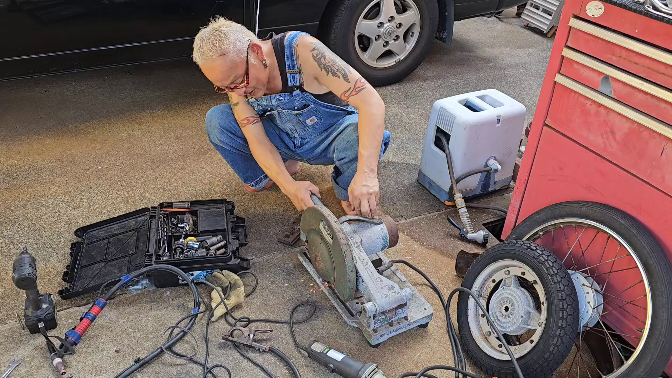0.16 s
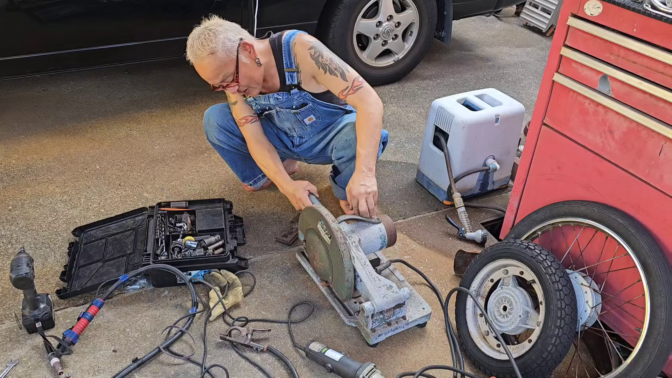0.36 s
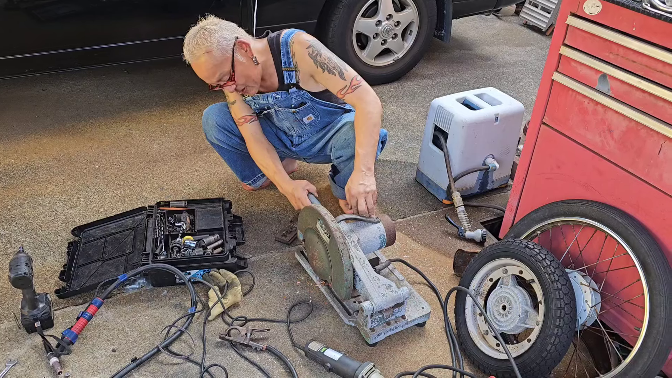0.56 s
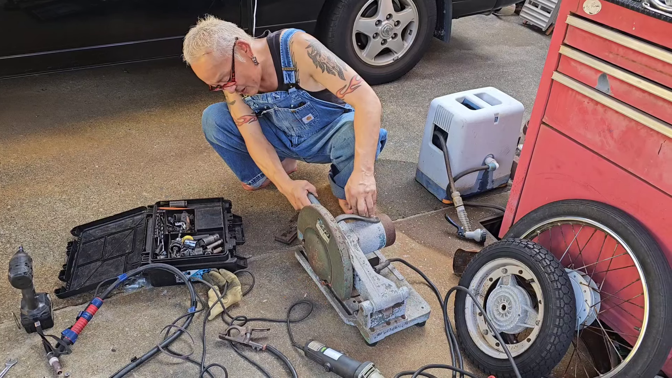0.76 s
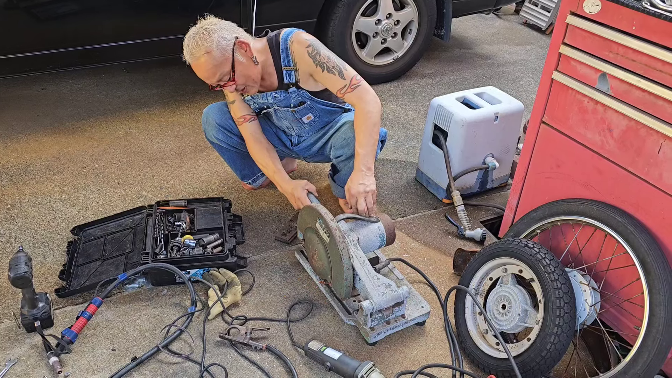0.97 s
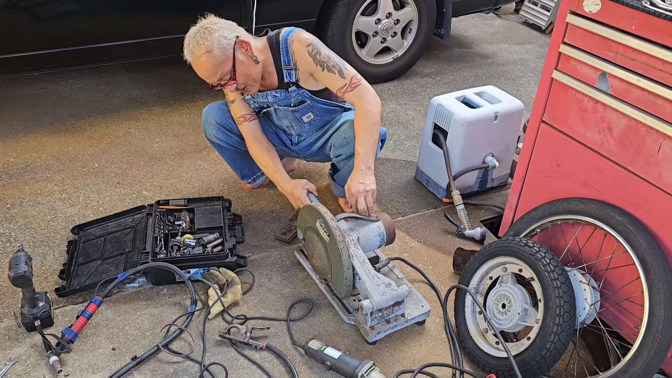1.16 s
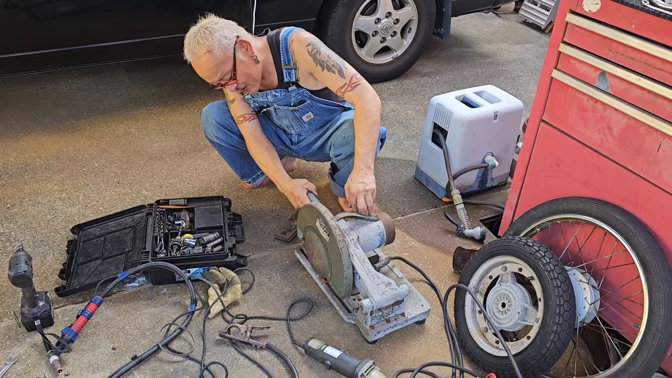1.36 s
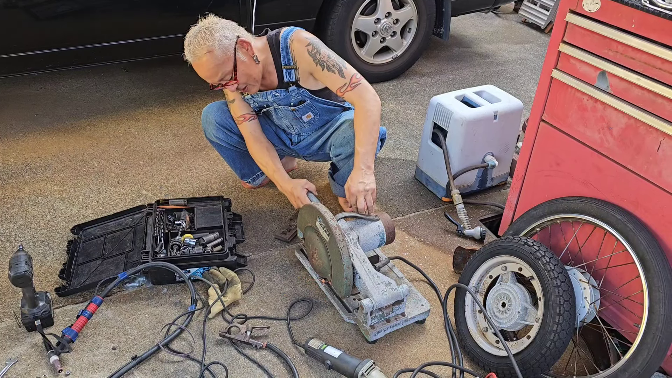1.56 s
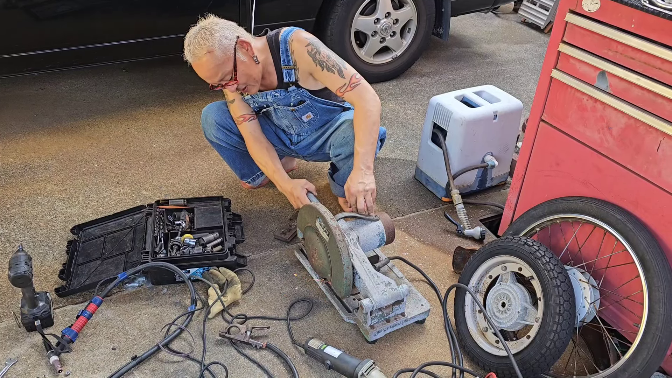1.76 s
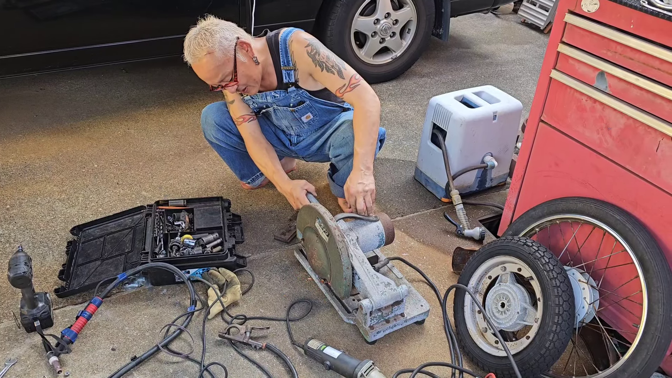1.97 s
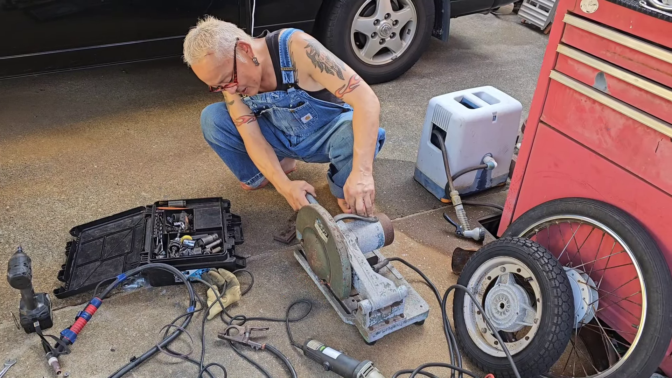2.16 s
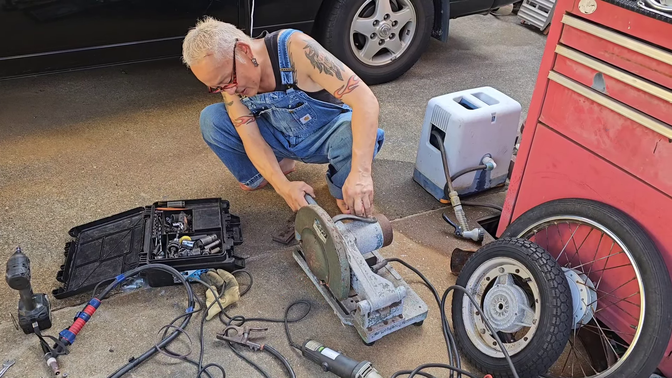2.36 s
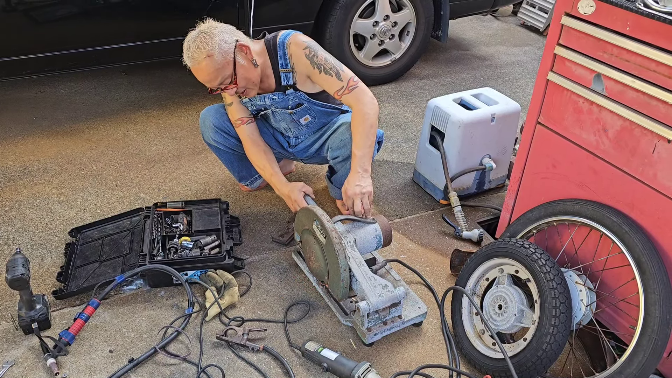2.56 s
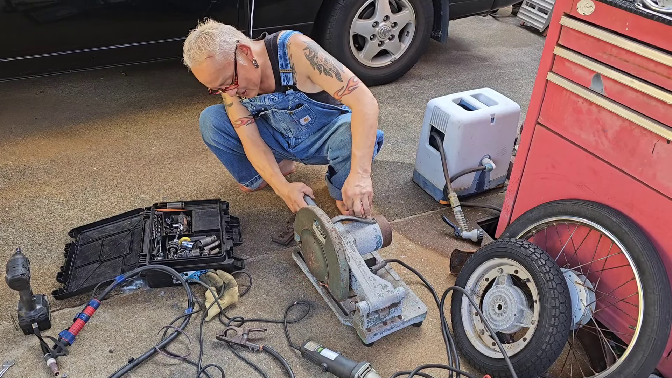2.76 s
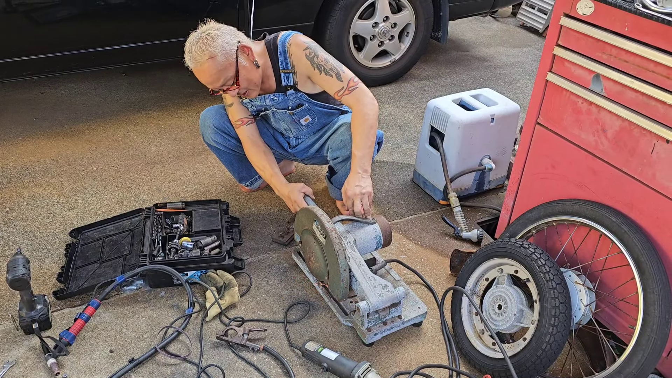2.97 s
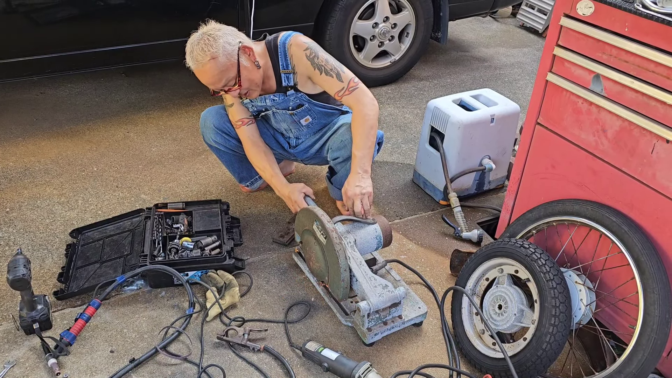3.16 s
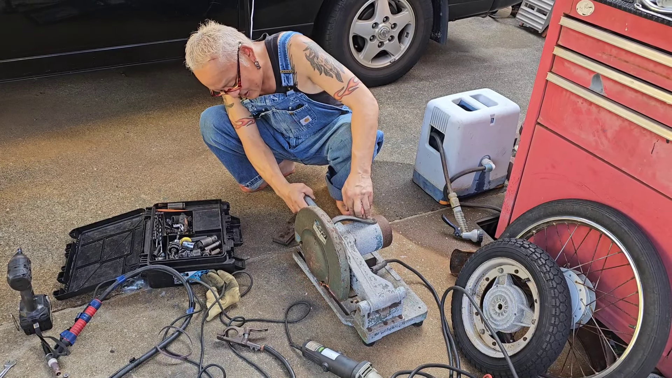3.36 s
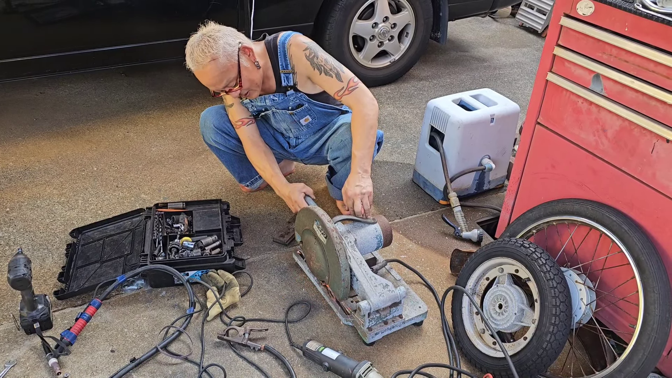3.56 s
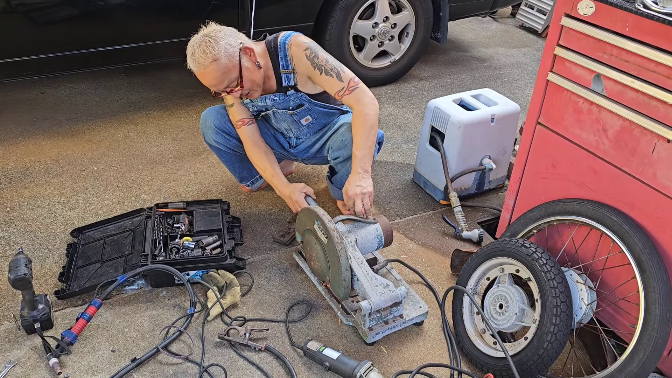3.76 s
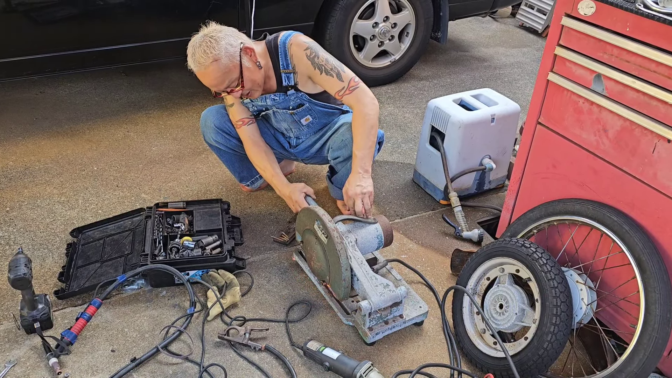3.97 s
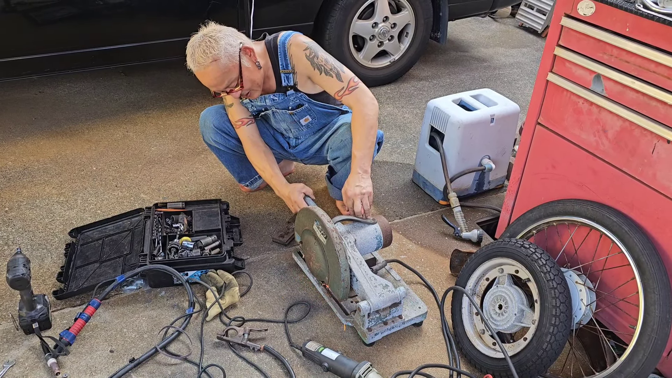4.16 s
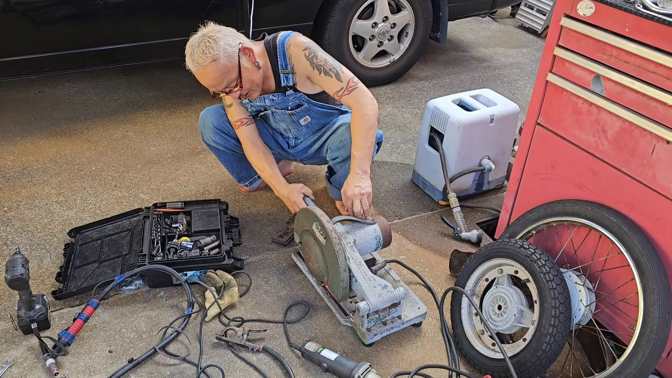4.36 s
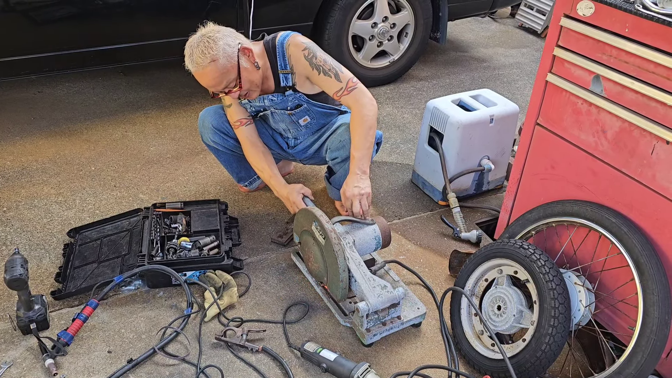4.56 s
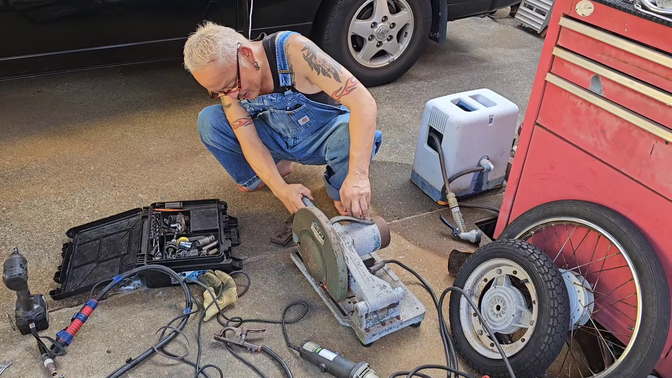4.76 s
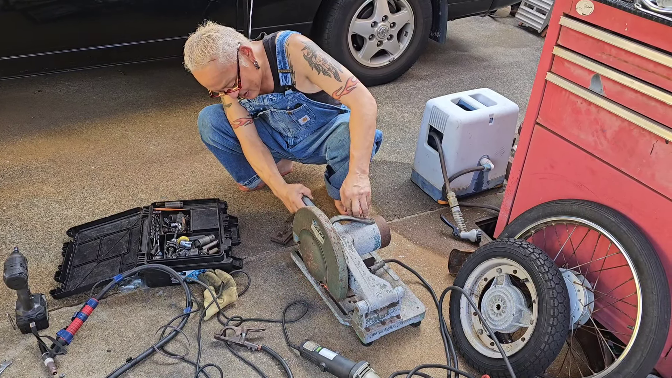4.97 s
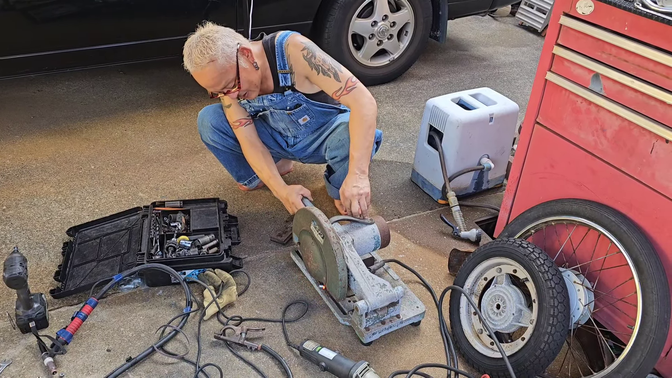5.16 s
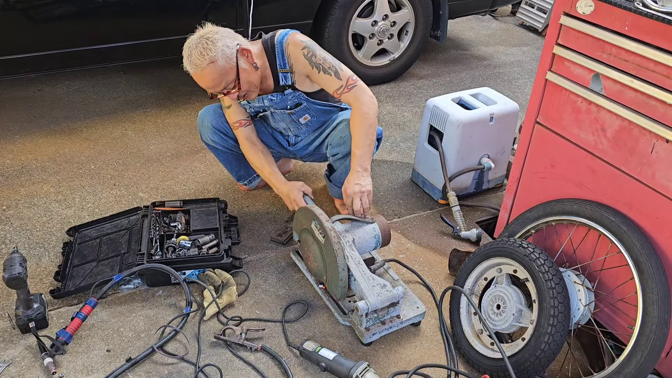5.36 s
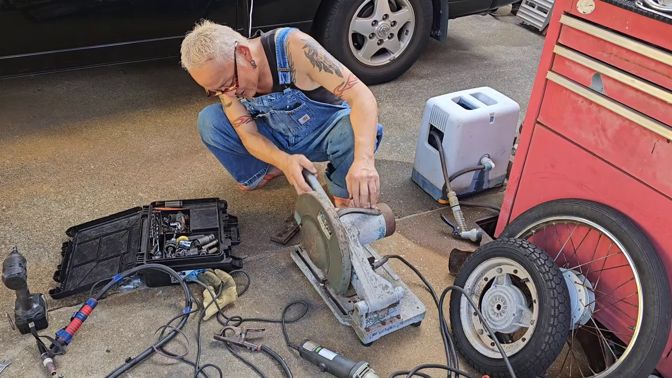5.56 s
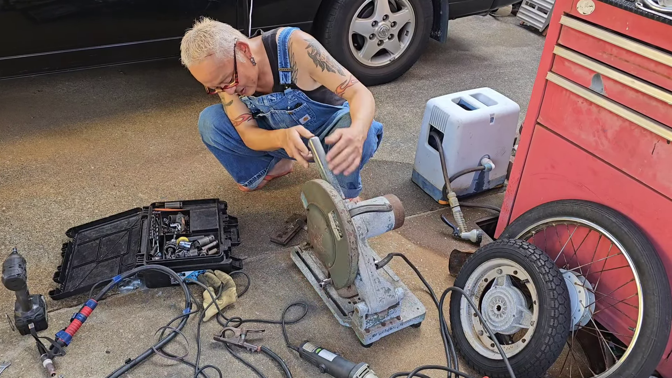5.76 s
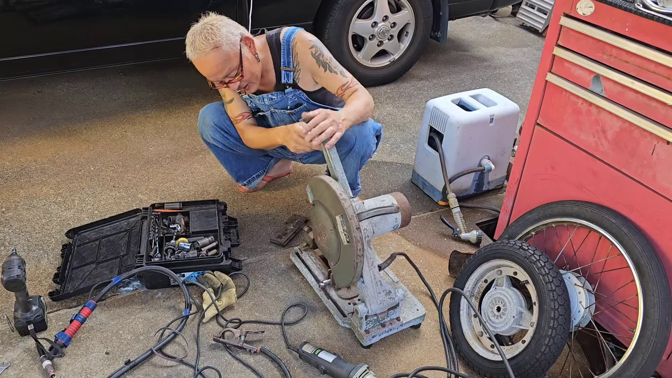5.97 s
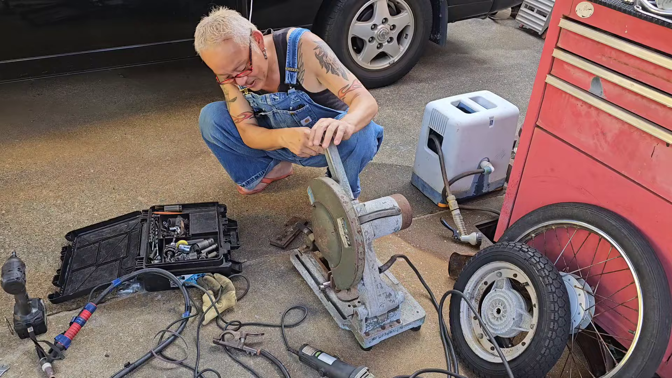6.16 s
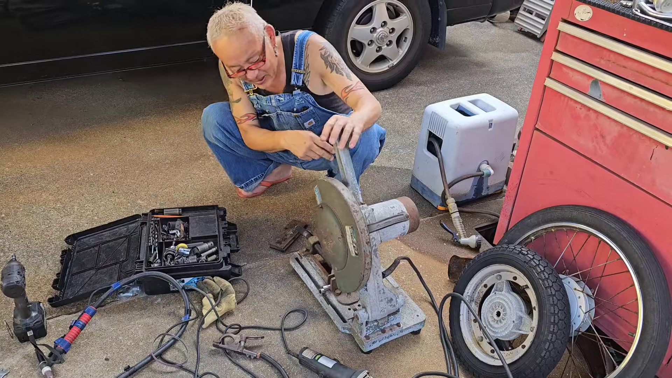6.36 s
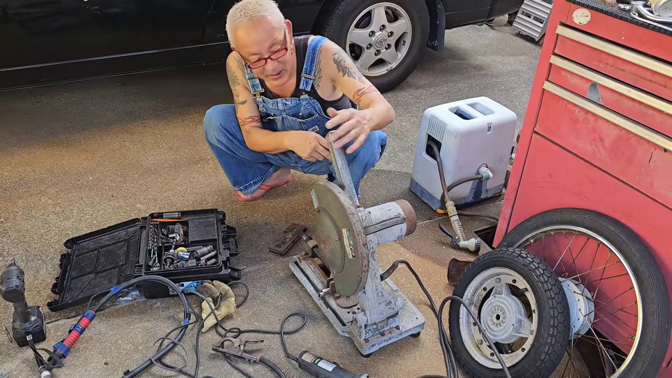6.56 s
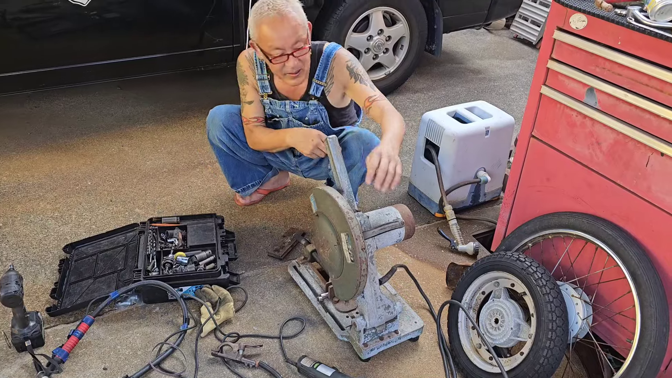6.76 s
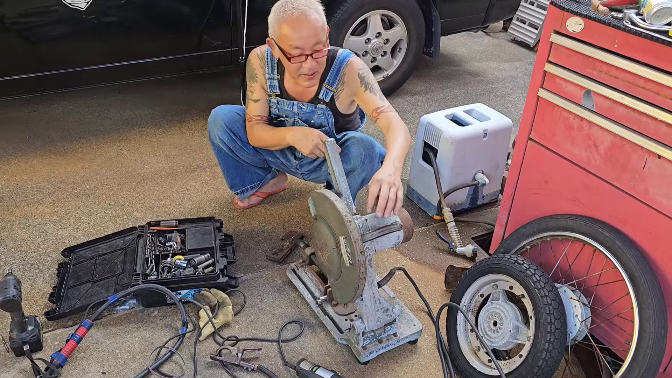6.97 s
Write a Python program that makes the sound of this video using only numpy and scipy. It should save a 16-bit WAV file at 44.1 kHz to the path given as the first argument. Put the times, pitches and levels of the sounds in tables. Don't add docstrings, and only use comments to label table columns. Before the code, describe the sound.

A chop saw is already biting into metal at full loudness, its electric whine wavering over harsh metallic grinding, ringing tube and sizzling grit. Late in the cut the motor speeds up, the last thin wall chatters and the grinding drops away. The disc coasts with a much quieter airy whir and sinking gear tone, and the lifted arm clacks. Mono phone pickup, nearly dry, faint short echoes, low rumble.

```python
import sys
import numpy as np
from scipy import signal
from scipy.fft import rfft, irfft
from scipy.io import wavfile
from scipy.ndimage import uniform_filter1d

SR = 44100
rng = np.random.default_rng(int(sys.argv[2]) if len(sys.argv) > 2 else 0)


def int16_out(signal):
    q = np.round(np.clip(np.atleast_2d(signal).T, -1, 1) * 32767)
    wavfile.write(sys.argv[1], SR, q.astype(np.int16))


def elevation(decibels):
    levels = np.asarray(decibels, float)
    return 10 ** (levels / 20)


N = 308700
STEP = 64
DISC_PER_SHAFT = 8 / 35
SWITCH_OFF_S = 5.5
STEADY_DB = 0.3

WHINE_ORDERS = (14, 14, 14, 8, 8.56, 7.8, 24, 1.003)
RIPPLE_HZ = (0, 100, -100, 0, 0, 0, 0, 0)
# time_s [s], level_db [dB]
COAST = [
    (5.52, -30),
    (5.7, -33),
    (6.3, -33.5),
    (6.55, -31),
    (6.85, -27),
    (7, -25.5),
]


def unit(x):
    return x / np.sqrt(np.mean(x ** 2))


def columns(table):
    s, *cols = np.transpose(table)
    return [np.interp(np.arange(N) / SR, s, c) for c in cols]


def window(t0, t1, fade):
    t = np.arange(N) / SR
    return np.clip(np.minimum(t - t0, t1 - t) / fade, 0, 1)


def bumps(t, table):
    return sum(db * np.exp(-((t - s) / half) ** 2) for s, half, db in table)


def walk(rate):
    hold = max(int(SR / STEP / rate), 1)
    held = np.repeat(rng.standard_normal(N // STEP // hold + 2), hold)
    return 1.01 * uniform_filter1d(uniform_filter1d(held, hold), hold)[:N // STEP + 2]


def fine_grid(slow):
    return np.interp(np.arange(N) / STEP, np.arange(len(slow)), slow)


def sway(db, rate):
    return fine_grid(elevation(db * walk(rate)))


def steep_mode(x, hz, width):
    b, a = signal.iirpeak(hz, hz / (1.5 * width), SR)
    return signal.sosfilt([[*b, *a]] * 2, x)


def ring(x, modes, drift_db):
    out = 0
    for k, (hz, width, db) in enumerate(modes):
        out = out + (-1) ** k * elevation(db) * sway(drift_db, 4.03) * steep_mode(x, hz, width)
    return unit(out)


def response(hz, modes):
    return np.abs(sum(elevation(db) / (1 + 2j * (hz - centre_hz) / width) for centre_hz, width, db in modes))


def colour(x, points):
    hz, db = np.transpose(points)
    f = np.arange(N // 2 + 1) * SR / N + 1
    gain = elevation(np.interp(np.log(f), np.log(hz), db, -90, -90))
    return unit(irfft(rfft(x) * gain, N))


def grit(turns, repeat, wear_turns, scatter=0.5):
    cells = 1024
    wear = turns / wear_turns
    patterns = rng.standard_normal((128, cells))
    row = wear.astype(int) % 127
    fade = np.sin(wear % 1 * np.pi / 2)
    cell = (turns % 1 * cells).astype(int)
    worn = np.sqrt(1 - fade ** 2) * patterns[row, cell] + fade * patterns[row + 1, cell]
    share = np.clip(repeat, 0, 1)
    fresh = rng.standard_normal(N) * np.exp(scatter * rng.standard_normal(N))
    return np.sqrt(share) * worn + np.sqrt(1 - share) * unit(fresh)


def shaft():
    # time_s [s], shaft_hz [Hz]
    loaded_speed = [(0, 153.6), (.27, 154), (.55, 160.3), (.75, 166.3), (.95, 168.8), (1.07, 170.5),
                    (1.25, 174.3), (1.5, 176), (2, 177), (2.3, 174.7), (2.68, 176.3), (2.85, 174.8),
                    (3.25, 166.2), (3.6, 167.3), (4.25, 166.2), (4.6, 172.6), (4.8, 172.9), (5.18, 184.3)]
    inertia_s, race_hz_per_s = 0.09, 133
    idle_hz, slowing_from_s, slowing_hz_per_s = 225.5, 5.56, 20.6
    t = np.arange(N) / SR
    racing = uniform_filter1d(columns(loaded_speed)[0], size=int(inertia_s * SR))
    racing = racing + race_hz_per_s * np.maximum(t - loaded_speed[-1][0], 0)
    return np.minimum(racing, idle_hz - slowing_hz_per_s * np.maximum(t - slowing_from_s, 0))


def cut(turns):
    # time_s [s], depth [0-1]
    runout = [
        (0, 0.05),
        (5.05, 0.12),
        (5.3, 0.28),
        (5.66, 0.98),
    ]
    # pitch_hz [Hz], width_hz [Hz], level_db [dB]
    base_modes = [(244, 19, -17.5), (325.6, 64, -13), (471, 52.6, 2), (692, 81, -6), (849, 64, -12),
                  (994, 390, -18.5)]
    tube_modes = [(1164, 99, -10.5), (1286, 130, -3.5), (1416, 194, -3), (1602, 133, 1.5), (1793, 88, -8)]
    wall_modes = [(1930, 160, 4), (2087, 73, 1), (2307, 206, 0.5), (2590, 120, -10.5)]
    guard_modes = [(2786, 203, 15.5), (2897, 76, 14), (3080, 26, 4)]
    rim_modes = [(6140, 180, -6.5), (6485, 60, 0.5), (6070, 580, -10)]
    spark_modes = [(6770, 300, -2), (7530, 710, -3), (8400, 340, -4.5), (9180, 940, -5.5),
                   (14400, 4400, -11.5)]
    disc_sing_modes = [(11130, 740, -2), (11240, 660, 2)]
    plate_free = [(6290, 110, 4), (7230, 77, -2), (7550, 70, 5), (8400, 76, -17), (9100, 70, -5),
                  (9400, 84, -5), (9900, 80, -7)]
    plate_sunk = [(6150, 350, -2), (7650, 71, 0), (9360, 210, -9), (11000, 200, -10), (12300, 210, -14)]
    seam_modes = [(1573, 33, 0)]
    # time_s [s], half_length_s [s], level_db [dB]
    seam_rings = [(0.301, .12, 4.9), (1.05, .13, 5.5), (1.85, 0.094, 10.6), (2.36, 0.12, 13),
                  (2.63, 0.077, 15), (3, 0.2, 8.8), (3.55, 0.17, 8), (4.1, 0.25, 5.1), (4.7, 0.25, 3.7),
                  (5.1, 0.22, 9.7)]
    # pitch_hz [Hz], level_db [dB per Hz]
    floor_hiss = [(1710, -31), (2900, -4), (3580, -7), (4090, -4), (5010, -5.5), (6180, -3), (6820, -2),
                  (10000, -9.5), (14500, -14.5), (15500, -12)]
    plate_drift_db = 3.5
    tube_db, wall_db, base_db, floor_db, rim_db, spark_db, sing_db, guard_db = body_levels()
    t = np.arange(N) / SR

    depth = np.clip(columns(runout)[0], 0, 1)
    bite = 1 + depth * np.sin(2 * np.pi * turns + fine_grid(1.5 * walk(9.3)))
    ripple = 1 + 0.04 * np.sin(2 * np.pi * 100 * t)
    pressure = bite * ripple * sway(0.59, 17.0) * sway(0.53, 20.5)
    coarse = grit(turns, 0.52, 9.0) * bite * ripple
    fine = grit(turns, 0.26, 4.0) * pressure

    base = ring(grit(turns, 0.3, 6.0) * bite * sway(0.87, 22), base_modes, 0.96)
    guard = ring(grit(turns, 0.93, 4.0) * bite, guard_modes, STEADY_DB)
    out = elevation(base_db + 2.5) * base + elevation(guard_db - 4.5) * guard
    out += elevation(tube_db - 0.2) * ring(coarse, tube_modes, 1.8)
    out += elevation(wall_db + 2.0) * ring(coarse, wall_modes, 1.8)
    out += elevation(floor_db + 7.5) * colour(grit(turns, 0.19, 5.0) * pressure, floor_hiss)

    out += elevation(rim_db - 3.5) * sway(1.5, 18) * ring(fine, rim_modes, STEADY_DB)
    out += elevation(sing_db - 1.5) * sway(1.5, 18) * ring(fine, disc_sing_modes, STEADY_DB)
    out += elevation(spark_db - 1.0) * ring(fine, spark_modes, 4.0)
    out += sway(2.3, 26) * passing_rings(fine)

    out += elevation(-26 + bumps(t, seam_rings)) * ring(coarse, seam_modes, STEADY_DB)
    out += elevation(spark_db - 9.5) * ring(fine, plate_free, plate_drift_db)
    out += elevation(-32) * window(2.51, 7.0, 0.2) * ring(fine, plate_sunk, plate_drift_db)
    return out * window(-1.1, 5.66, 0.26)


def body_levels():
    # time_s [s], feed_db on the handle [dB], free_rim_db [dB], rub_db of the disc flanks [dB]
    cut_course = [(0, -0.5, 5, -3), (.19, -2, 5, 1), (.39, 8.5, 5, -4), (.77, 3.5, 1.5, 11),
                  (1.06, -6.5, 2.5, 7.5), (1.2, -12.5, 1.5, 13), (1.34, -5.5, 4.5, 13),
                  (1.99, -3.5, 3, 7.5), (2.2, 3.5, 3, 4), (2.54, 2, -1, -4), (2.79, 8.5, 1, 5),
                  (2.93, -0.5, -9, -16), (3.2, 4.5, -9, -17), (3.4, -3.5, -10, 2), (3.96, -2, -16, -4),
                  (4.49, -4.5, -11, 11), (4.93, -6.5, -30, 3.5), (5.35, -15.5, -4, 7)]
    # level_db [dB], shares of feed, free rim and rub [dB per dB], deepening [dB per s]
    bodies = [
        (-15.5, 0.27, .01, .01, -0.67),
        (-21, .01, 0.012, 0.056, 0),
        (-25, 0.69, .01, 0.0093, 0.63),
        (-33, 0.024, 0.042, 0.11, 1.57),
        (-21.5, .01, .01, 0.5, -0.57),
        (-14.5, .01, 0.38, 0.21, -4),
        (-23, .01, 1, .01, 0.54),
    ]
    # time_s [s], level_db [dB]
    wall_bite = [(0, -1), (1.1, -2.5), (1.34, 5), (2.05, 0.5), (2.5, 0.5), (2.95, -1.5), (3.15, 3),
                 (3.6, 0), (5.1, 0.5), (5.3, -4.5)]
    # time_s [s], half_length_s [s], level_db [dB]
    clamp_slack = [(.55, 0.35, -0.5), (1.06, 0.18, 5.5), (1.505, 0.11, -2.5), (0.036, 0.076, 1),
                   (1.893, 0.2, -2), (2.297, .15, 0.5), (2.615, 0.082, -3.5), (3.4, 0.13, -1.5),
                   (5.1, 0.15, -0.5)]
    # start_s [s], end_s [s], fade_s [s], level_db [dB]
    faces = [
        (-0.95, 1.11, 0.95, -9.5),
        (0.5, 2.33, 0.4, -24),
        (5, 5.3, 0.14, -14.5),
    ]
    guard_rest_db, bite_on_tube = -29.5, 0.44
    feed, free, rub = columns(cut_course)
    t = np.arange(N) / SR
    levels = [db + a * feed + b * free + c * rub + slope * t for db, a, b, c, slope in bodies]
    bite_db = columns(wall_bite)[0]
    levels[0] = levels[0] + bite_on_tube * bite_db + bumps(t, clamp_slack)
    levels[1] = levels[1] + bite_db
    guard = elevation(guard_rest_db) + sum(elevation(db) * window(t0, t1, fade) ** 2 for t0, t1, fade, db in faces)
    return levels + [20 * np.log10(guard)]


def passing_rings(scrape):
    # start_s [s], end_s [s], level_db [dB], pitch_hz [Hz], width_hz [Hz]
    ring_spans = [(2.06, 2.48, -24, 5200, 670), (2.12, 2.38, -23, 5750, 500), (2.12, 2.45, -26, 6100, 220),
                  (2.08, 2.32, -22.5, 6900, 250), (-.3, 0.52, -29, 4290, 83), (-.15, .4, -28, 497, 47),
                  (1.9, 2.94, -24, 461, 29), (3.8, 4.8, -31.5, 473, 50), (4.15, 4.78, -32, 856, 84),
                  (.25, 1.2, -30.5, 3150, 65), (.85, 1.25, -23, 2110, 120), (.15, 0.53, -21, 2320, 120),
                  (4.86, 5.28, -23, 2850, 220), (-.2, .5, -29, 4000, 660), (5.2, 5.62, -33.5, 910, 550),
                  (2.75, 3.1, -28.5, 3960, 100), (4.55, 4.85, -30, 3990, 54), (5.02, 5.28, -28, 4130, 297),
                  (5.1, 5.24, -26, 4300, 270), (2.54, 2.66, -23.5, 6200, 500), (5.27, 5.4, -29, 3200, 350),
                  (1.75, 2.2, -22, 2200, 93)]
    out = np.zeros(N)
    for start, end, db, hz, width in ring_spans:
        span = slice(max(int(start * SR), 0), int(end * SR))
        t = np.arange(N)[span] / SR
        fade = np.clip(np.minimum(t - start, end - t) / (0.3 * (end - start)), 0, 1)
        out[span] += elevation(db) * fade * unit(steep_mode(scrape[span], hz, width))
    return out


def web(turns):
    # time_s [s], level_db [dB]
    web_course = [(5.22, -43), (5.3, -33), (5.37, -18), (5.44, -20), (5.5, -18), (5.54, -21.5),
                  (5.575, -28), (5.592, -22), (5.62, -26), (5.66, -39)]
    # pitch_hz [Hz], width_hz [Hz], level_db [dB]
    web_modes = [(1940, 230, 6.5), (2850, 53, -5), (3289, 266, 3), (4630, 81, -9), (5200, 240, -1.5),
                 (6104, 165, -2), (6800, 150, -10), (7160, 73, 1), (8300, 410, -8.5), (9440, 310, -6.5),
                 (10800, 510, -10), (12400, 400, -14)]
    burst = np.exp(0.45 * np.sin(2 * np.pi * turns + 1.2)) * sway(1.2, 40)
    rattle = ring(rng.standard_normal(N) * burst, web_modes, STEADY_DB)
    return elevation(columns(web_course)[0] + 5.5) * rattle * window(5.2, 5.68, 0.042)


def motor(shaft_hz, levels_db):
    whine_throb = (0.091, 0.039, 0.35, 0.3, 0.23, 0.23, 0.22, 0.05)
    # multiple of shaft, level_db [dB], pitch_hz [Hz], width_hz [Hz]
    resonant_orders = [(16, -21, 2925, 142), (16.15, -20.5, 2470, 140), (11.98, -27, 2610, 76),
                       (0.99, -47, 166, 9.67), (9.48, -29, 1896, 160), (47.8, -37, 8000, 260)]
    # start_s [s], end_s [s], multiple of disc, level_db [dB]
    disc_hum = [(0.37, 1.1, 5, -45), (.2, 1.17, 6, -49), (0.24, 1.05, 7, -38.5), (1.33, 1.89, 8, -36.5),
                (1.968, 3.206, 6, -40.5), (1.95, 2.92, 7, -33), (2.94, 4.2, 6, -44), (2.75, 3.86, 5, -44.5),
                (3.42, 4.773, 8, -36), (1.4, 2.149, 24, -37), (2.35, 3.04, 24, -34.5),
                (3.005, 5.1, 26, -44), (3.97, 4.952, 23, -36.5), (4.11, 4.599, 25, -29.5),
                (1.48, 2.03, 47, -18), (1.26, 2.23, 57, -25), (1.75, 2.3, 70, -40)]
    turns, t, out = np.cumsum(shaft_hz) / SR, np.arange(N) / SR, 0
    disc = 2 * np.pi * DISC_PER_SHAFT * turns
    live = window(-1.1, SWITCH_OFF_S, 0.082)
    for order, ripple, throb, db in zip(WHINE_ORDERS, RIPPLE_HZ, whine_throb, levels_db):
        pulse = 1 + throb * np.sin(disc + fine_grid(3.2 * walk(12)))
        swell = elevation(db) * sway(0.93 + 6.7 * throb, 30) * pulse
        if order > 9:
            swell = swell * live
        jitter = fine_grid((0.35 + throb) * walk(25))
        out = out + swell * np.sin(2 * np.pi * (order * turns + ripple * t) + jitter)
    for order, db, hz, width in resonant_orders:
        near = elevation(db) * sway(2.2, 14) / (1 + (2 * (order * shaft_hz - hz) / width) ** 2)
        out = out + near * np.sin(2 * np.pi * order * turns + fine_grid(0.2 * walk(25)))
    for start, end, order, db in disc_hum:
        span = slice(int(start * SR), int(end * SR))
        fade = np.clip(np.minimum(t[span] - start, end - t[span]) / 0.17, 0, 1)
        out[span] += elevation(db) * fade * np.sin(order * disc[span])
    return np.sqrt(2) * out


def whine_levels(shaft_hz):
    loaded_db = (-1.5, -9, -11, -1.5, -9.5, -10, -28, -70)
    free_db = (-22, -40, -26.5, -12, -4.5, -8, -50, -27.5)
    line_wander_db = (.7, .6, 1, 1, 1.5, 1.5, .8, 1.1)
    # pitch_hz [Hz], width_hz [Hz], level_db [dB]
    housing = [(2270, 89, -42), (2321, 135, -17), (2427, 57, -9.5), (2686, 107, -11.5), (2840, 27, -18)]
    gearbox = [(1327, 66, -26.5), (1446, 52, -24), (1594, 118, -16.5), (1680, 120, -23)]
    raised_arm = [(210, 74, -17), (1640, 73, -22.5), (1710, 68, -27), (1850, 88.4, -25.5)]
    brush_modes = [(3935, 127, -0.24), (4290, 280, -1.2)]
    # time_s [s], half_length_s [s], level_db [dB]
    grips = [
        [(.25, 0.34, -14), (.8, 0.11, 1), (1.22, 0.11, 3.5), (1.62, 0.17, -3), (2.3, 0.24, 0.5),
         (2.97, 0.12, 3.5), (4.05, 0.2, -6), (4.6, 0.097, -1), (4.85, 0.06, 4), (5, 0.064, 2), (5.3, 0.06, 1),
         (5.43, 0.059, -18)],
        [(.15, 0.24, 1.5), (.38, 0.066, 1), (.78, 0.11, 2), (1.9, 0.3, 9), (3.25, 0.07, 1), (4.33, 0.092, 0),
         (5.16, 0.065, 4), (5.42, 0.058, -25)],
        [(.6, 0.22, -8), (1.55, 0.16, 3), (1.9, 0.12, 2.5), (2.3, 0.18, -12), (2.85, .3, -1), (4.4, .1, -3),
         (5, 0.09, 4), (5.3, 0.045, 7), (5.43, .05, -12)],
        [(2.3, 0.15, -3), (3, .08, -19), (3.4, 0.3, 4), (4.1, 0.074, 6.5), (4.75, 0.19, -9), (5.38, 0.17, -11)],
        [(.35, 0.06, 7.5), (.8, 0.37, 9), (2.3, 0.26, -3), (3.7, 0.13, 9), (4.15, 0.065, 9), (4.45, 0.047, 9),
         (5.82, .05, -12), (5.95, 0.06, 5.5), (6.3, 0.23, 3.5), (6.815, 0.066, 9.5), (6.89, .03, -3),
         (6.97, 0.043, 6.5)],
        [(.65, 0.18, 6), (1.1, .2, -1.5), (2.45, 0.053, 14.5), (3.2, 0.078, 10.5), (3.75, 0.13, 8),
         (4.62, 0.075, 12), (5.75, 0.1, 4), (6.05, .06, 4), (6.33, 0.083, 5.5), (6.53, 0.068, 7.5),
         (6.66, 0.039, -10), (6.9, .06, -8)],
        [(2.33, 0.15, 17), (2.85, 0.046, 12), (3.1, 0.095, 8), (3.38, .1, 0), (4, 0.11, 4), (4.28, 0.13, 9),
         (4.9, 0.067, 3), (5.12, .12, -16), (3.55, 0.11, -1), (2.95, .05, 7), (3.2, 0.054, 0)],
        [],
    ]
    brush_full_s, brush_db_per_s = 3.63, 10
    arm_up_s, arm_rise_s = 5.9, 0.47
    t = np.arange(0, N + STEP, STEP) / SR
    hz = np.append(shaft_hz[::STEP], shaft_hz[-1])
    loaded = np.clip((SWITCH_OFF_S + 0.1 - t) / 0.12, 0, 1)
    raised = np.clip(1 - (arm_up_s - t) / arm_rise_s, 0, 1)
    coast = elevation(np.interp(t, *np.transpose(COAST)) + 34) * raised
    brush = elevation(-brush_db_per_s * np.maximum(brush_full_s - t, 0))
    levels = []
    for order, ripple, on_db, off_db, wander_db, grip in zip(WHINE_ORDERS, RIPPLE_HZ, loaded_db, free_db,
                                                             line_wander_db, grips):
        f = order * hz + ripple
        if order > 20:
            body = brush * response(f, brush_modes)
        else:
            body = response(f, housing if order > 9 else gearbox)
        gain = elevation(on_db) * loaded * body + elevation(off_db) * coast * response(f, raised_arm)
        swell_db = bumps(t, grip) + wander_db * walk(4.89)[:len(t)]
        levels.append(fine_grid(20 * np.log10(gain + 1e-9) + swell_db))
    return levels


def chatter(shaft_hz, brush_db):
    # start_s [s], end_s [s]
    shifts = [
        (2.7, 3.69),
        (4.8, 5.25),
    ]
    breadth_hz = 110
    phase = 2 * np.pi * WHINE_ORDERS[6] * np.cumsum(shaft_hz) / SR
    wobble = fine_grid(walk(breadth_hz) + 1j * walk(breadth_hz))
    active = sum(window(t0, t1, 0.1) for t0, t1 in shifts)
    return elevation(brush_db + 2.5) * active * np.real(wobble * np.exp(1j * phase))


def fan(turns):
    # pitch_hz [Hz], level_db [dB per Hz]
    fan_low = [(120, -23), (200, -20), (291, -19.5), (473, -5.5), (697, -7.5), (1040, -6.5), (1220, -5.5),
               (1780, 0.5), (2200, -5), (2800, -16), (3640, -13), (6160, -120)]
    fan_high = [(1650, -20), (2800, -2), (4930, -7.5), (6110, -9), (7570, -10), (8250, -10.5),
                (10600, -14.5), (13000, -14.5), (15500, -21)]
    # pitch_hz [Hz], width_hz [Hz], level_db [dB]
    cowl_modes = [(3760, 49, 1), (4700, 42, 3), (5300, 350, -8), (6460, 59.4, 1), (6800, 174, -3),
                  (8230, 74, 0), (8960, 79, -12), (9900, 89, -4), (10800, 262, -9), (11900, 96, -12)]
    # time_s [s], half_length_s [s], level_db [dB], band_hz [Hz], width_hz [Hz]
    vents = [
        (5.95, 0.32, 7, 8700, 3500),
        (5.95, 0.12, -9, 12300, 4100),
        (6.56, .2, 3.5, 11900, 3000),
        (6.82, 0.22, 4, 4800, 3100),
    ]
    low_db = columns(COAST)[0]
    high_db = -20.5 + 0.35 * low_db
    t = np.arange(N) / SR
    throb = (1 + 0.097 * np.sin(2 * np.pi * turns)) * sway(1.0, 25)
    low = colour(grit(turns, 0.33, 5.0) * throb, fan_low)
    air = rng.standard_normal(N) * throb
    high = colour(air, fan_high) + elevation(-15) * ring(air, cowl_modes, 1.5)
    for s, half, db, hz, width in vents:
        band = signal.lfilter(*signal.iirpeak(hz, hz / width, SR), high)
        high = high - (1 - elevation(db)) * np.exp(-((t - s) / half) ** 2) * band
    return (elevation(low_db + 10.0) * low + elevation(high_db + 6.5) * high) * window(5.375, 8.1, 0.19)


def knocks():
    # time_s [s], peak_db [dB], pitch_hz [Hz]
    arm_hits = [
        (5.548, -11, 1998),
        (5.568, -1, 1930),
        (5.592, -2, 1930),
        (5.896, -4, 1850),
        (6.728, 2, 1710),
        (6.829, 6, 1700),
        (6.904, -14, 1832),
    ]
    out, t = np.zeros(N), np.arange(2048) / SR
    for s, db, hz in arm_hits:
        crack = 0.15 * rng.standard_normal(2048) * np.exp(-t / 0.0011)
        hit = np.sin(2 * np.pi * hz * t) * np.exp(-t / 0.0016) + crack
        out[int(s * SR):int(s * SR) + 2048] += elevation(db - 3) * hit * np.clip(t / 0.0006, 0, 1)
    return out


def ticks():
    # time_s [s], peak_db [dB]
    catch_ticks = [
        (6.729, -17),
        (6.763, -12),
    ]
    tick_hz, decay_s, rise_s = 9370, 0.0054, 0.0015
    out, t = np.zeros(N), np.arange(2048) / SR
    tick = np.sin(2 * np.pi * tick_hz * t) * np.exp(-t / decay_s) * (1 - np.exp(-t / rise_s))
    for s, db in catch_ticks:
        out[int(s * SR):int(s * SR) + 2048] += elevation(db) * tick
    return out


def echoes(hits):
    t = np.arange(8192) / SR
    tail = rng.standard_normal(8192) * np.exp(-t / 0.037)
    return elevation(-48.0) * signal.fftconvolve(hits, tail)[:N]


def rumble():
    # pitch_hz [Hz], level_db [dB per Hz]
    floor_rumble = [(18, -60), (30, -37), (70, 0.5), (129, -17), (156, -1.5), (220, 5), (290, -30),
                    (480, -120)]
    return elevation(-50.5) * colour(rng.standard_normal(N), floor_rumble)


def scene():
    shaft_hz = shaft()
    levels_db = whine_levels(shaft_hz)
    turns = np.cumsum(shaft_hz * DISC_PER_SHAFT) / SR
    saw = cut(turns) + web(turns) + motor(shaft_hz, levels_db) + chatter(shaft_hz, levels_db[6]) + fan(turns)
    hits = knocks() + ticks()
    hits = hits + echoes(hits)
    no_bass = signal.butter(4, 150, "highpass", fs=SR, output="sos")
    mono = signal.sosfilt(no_bass, saw + hits) + rumble()
    return np.array([mono, mono])


def roll_off(x):
    return signal.sosfilt(signal.butter(12, 15640, fs=SR, output="sos"), x)


def record(dry):
    no_top = signal.ellip(8, 0.2, 60, 15650, fs=SR, output="sos")
    no_bass = signal.butter(2, 60, "highpass", fs=SR, output="sos")
    rounded = np.tanh(0.7 * dry[0]) / 0.7
    mono = np.clip(signal.sosfilt(np.vstack([no_top, no_bass]), rounded), -0.97, 0.97)
    return roll_off(np.array([mono, mono]))


dry = scene()
out = record(dry)
int16_out(out)
```